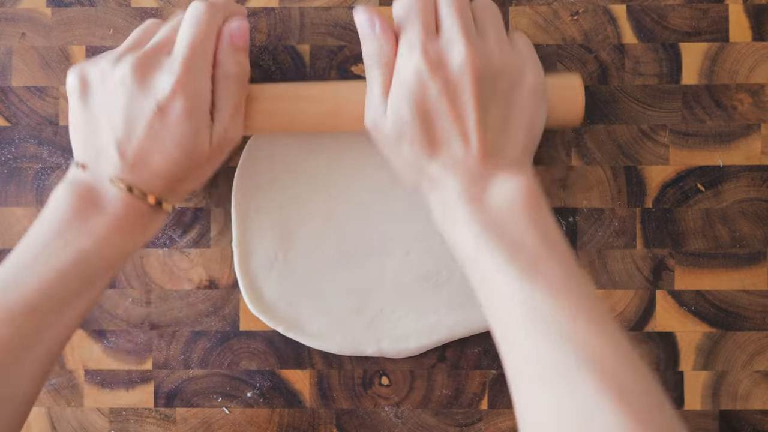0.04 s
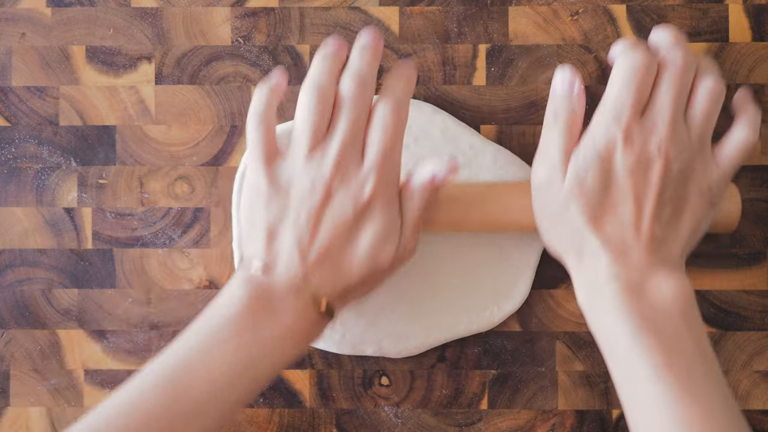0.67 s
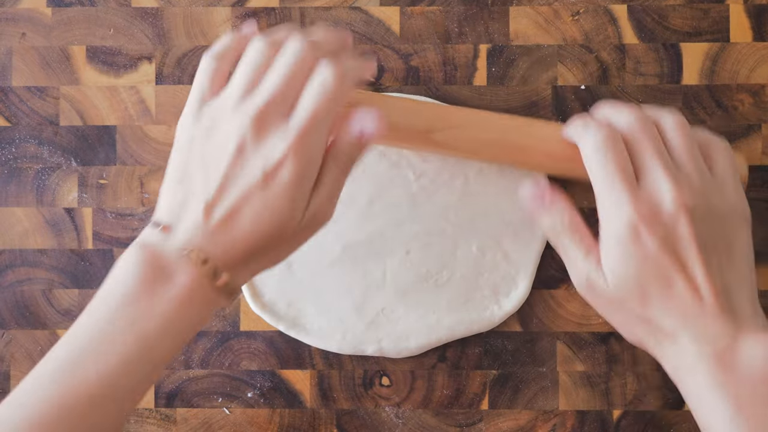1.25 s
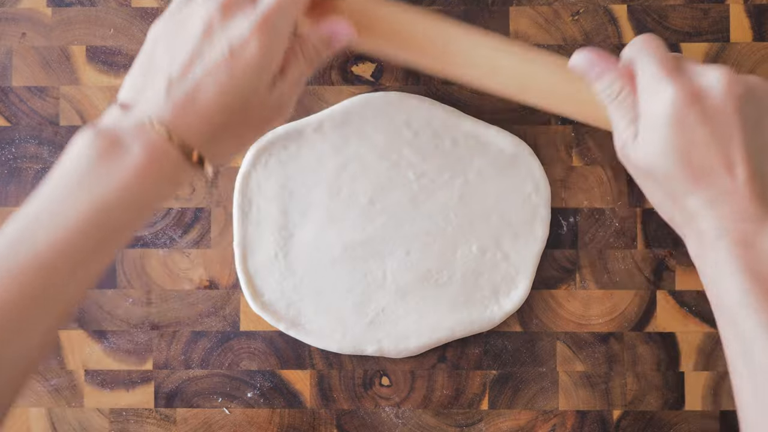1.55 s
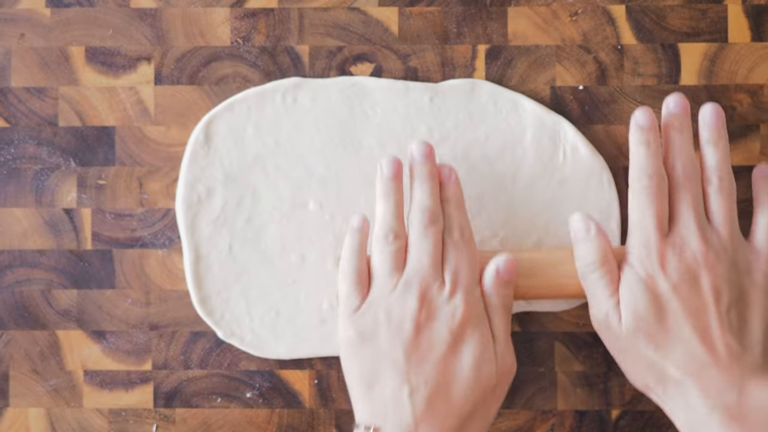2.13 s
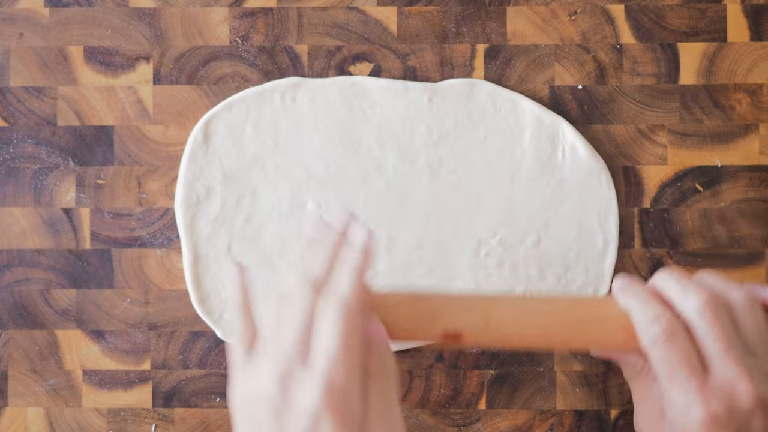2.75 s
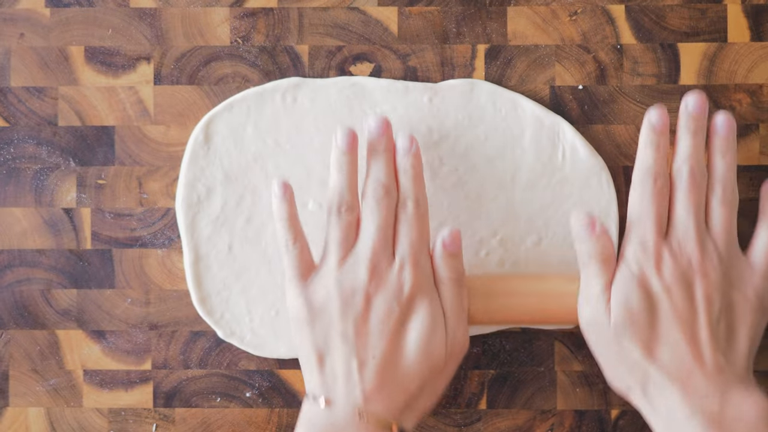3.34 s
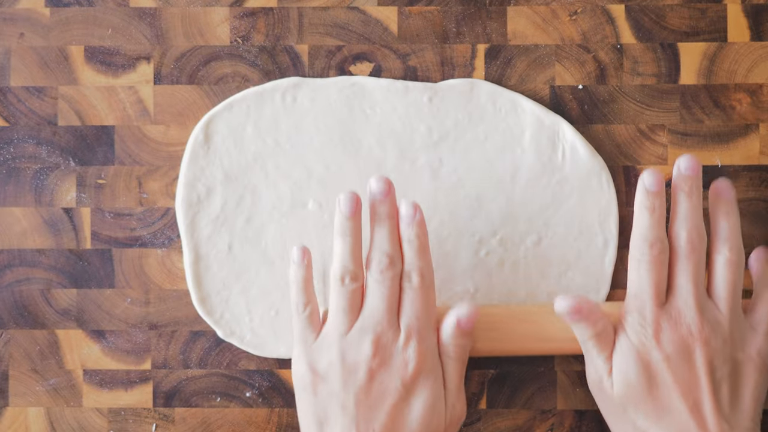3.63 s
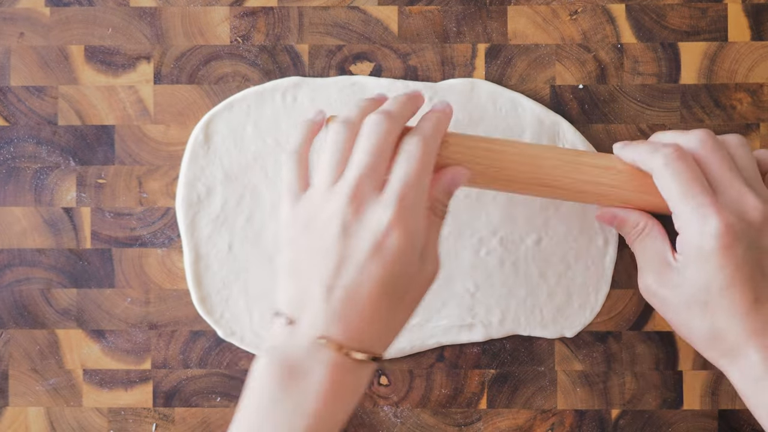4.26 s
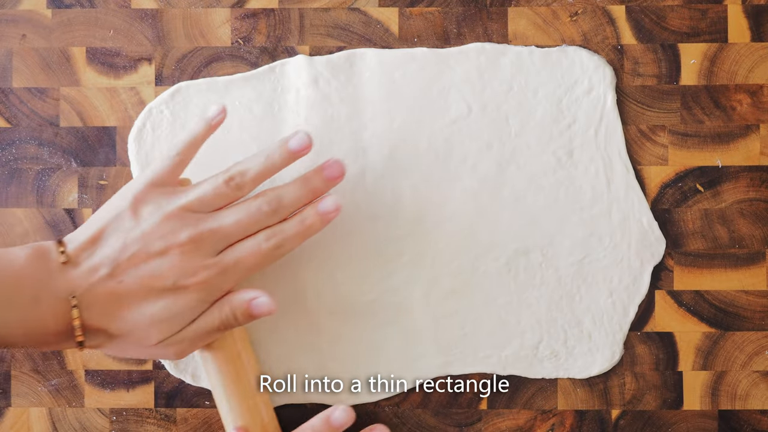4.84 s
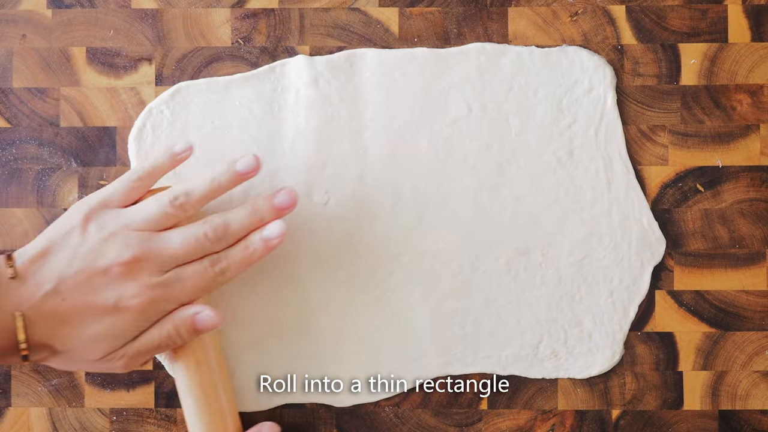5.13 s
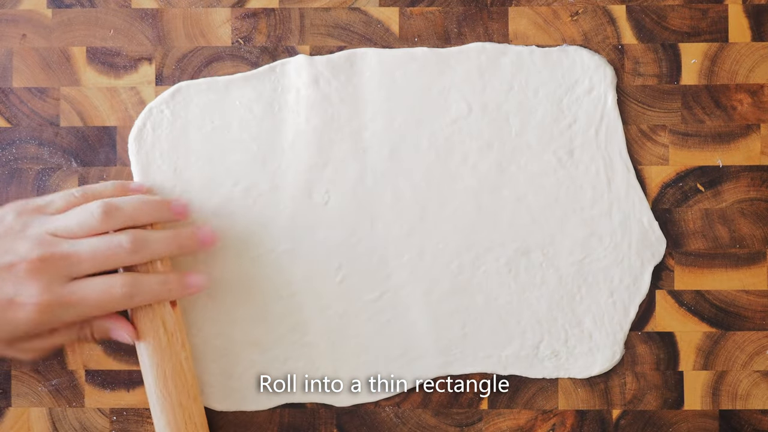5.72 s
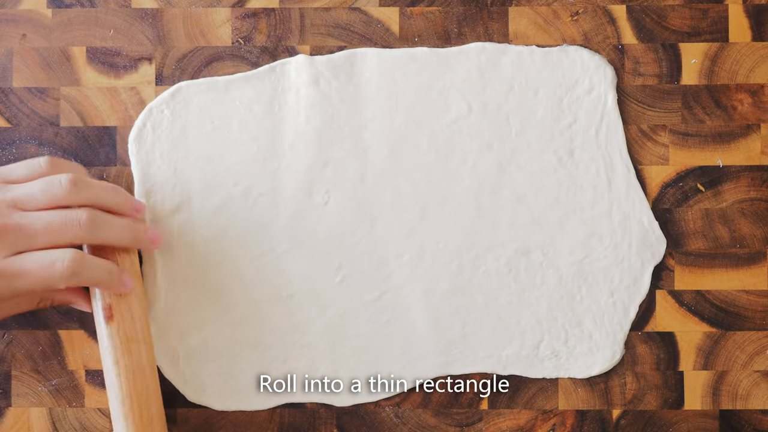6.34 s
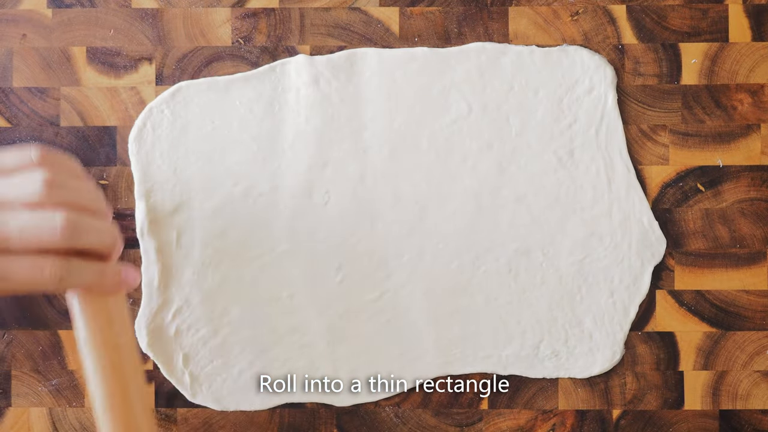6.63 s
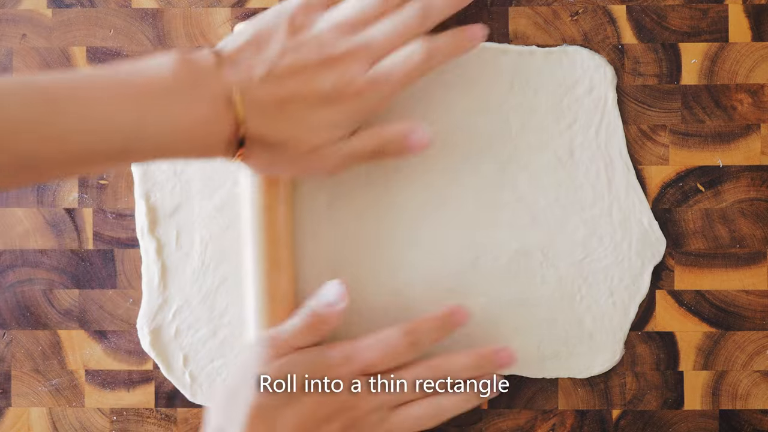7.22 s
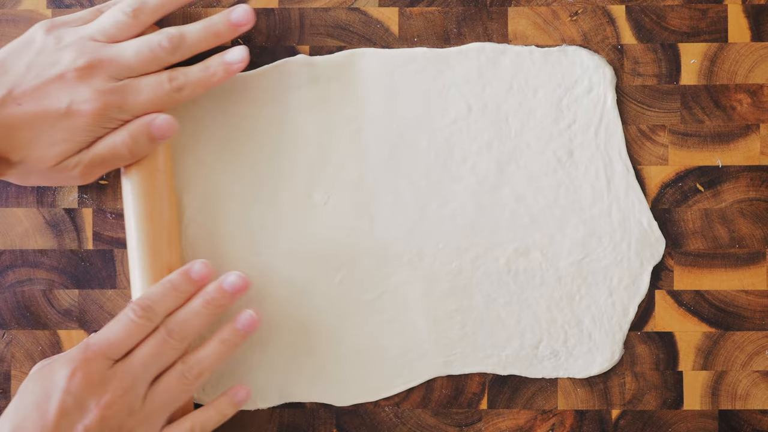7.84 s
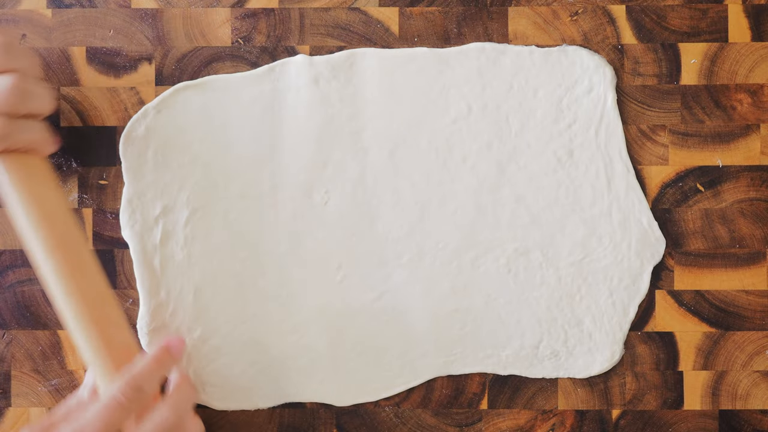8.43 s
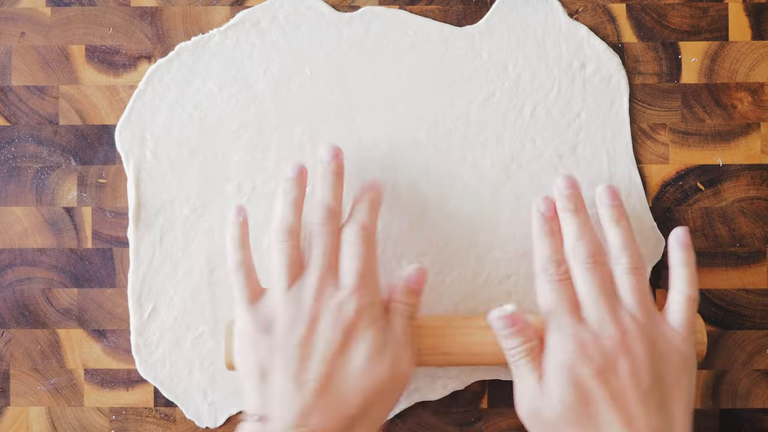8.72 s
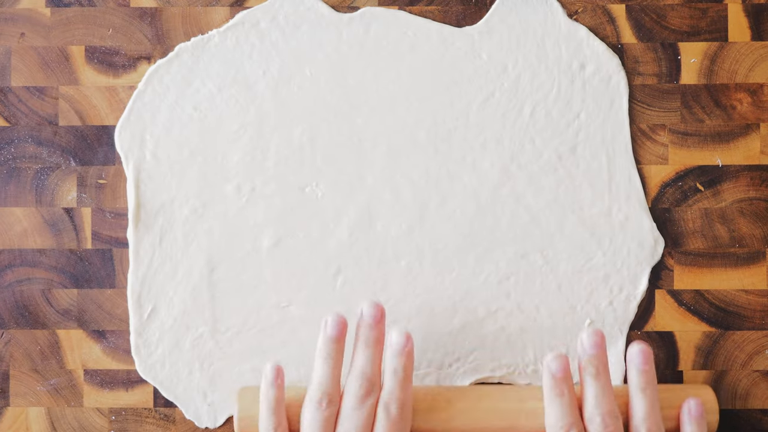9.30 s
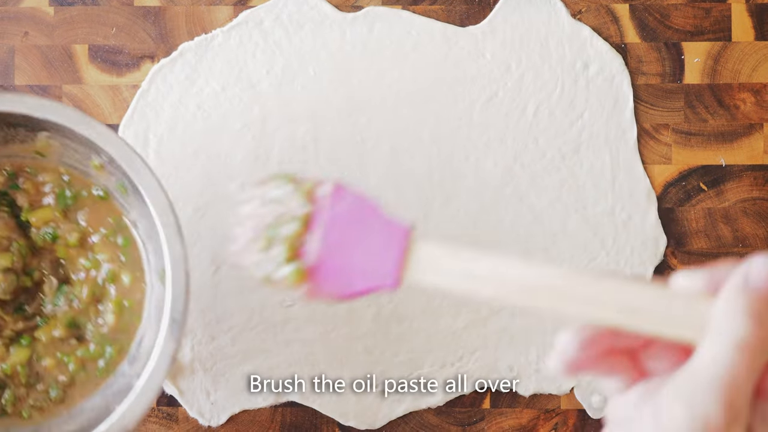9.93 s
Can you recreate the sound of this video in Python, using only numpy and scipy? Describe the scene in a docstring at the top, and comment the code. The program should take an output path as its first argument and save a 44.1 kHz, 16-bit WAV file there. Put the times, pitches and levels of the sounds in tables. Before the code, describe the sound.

A wooden rolling pin rolls dough on a wooden board, with soft rubbing, dull thuds and a few sharp knocks.

```python
"""Rolling pin on dough

A wooden pin flattens dough on a thick wooden board in a small kitchen. Impacts excite the damped
modes of the wood: dull thuds through the dough, bright knocks and rattles on the bare board.
Each stroke rocks the table at its lowest resonance. Palms rub the pin and brush the dough by
stick-slip friction. The sound is heard from close by, over room air and a little hiss."""
import sys
import numpy as np
from scipy import signal
from scipy.fft import rfft, irfft, next_fast_len
from scipy.io import wavfile

SR = 44100
rng = np.random.default_rng(int(sys.argv[2]) if len(sys.argv) > 2 else 0)


def unload_wav(signal):
    """Save mono or channel-first audio to the path in sys.argv[1] as 16-bit WAV at rate SR, clipped to [-1, 1]."""
    wavfile.write(
        sys.argv[1],
        SR,
        np.round(np.clip(np.atleast_2d(signal).T, -1, 1) * 32767).astype(np.int16),
    )


N = 439677
TIME = np.arange(N) / SR

# spectra of room air, table rumble, palm on pin, skin on dough: (frequency [Hz], relative density [dB])
AIR_SPECTRUM = [(20, -79.5), (35, -79.5), (48, -82), (65, -79), (110, -97), (200, -100), (350, -104),
                (408, -94), (470, -107), (650, -103), (1000, -112), (2500, -118), (8000, -129)]
RUMBLE_SPECTRUM = [(20, -11.5), (35, 11.5), (47, -11.5), (62, -5), (100, -24), (200, -33), (500, -50),
                   (5000, -84)]
PALM_SPECTRUM = [(500, -8.5), (1100, -10.5), (1650, 0.5), (2400, -5), (3500, 1), (4200, -3.5), (5300, -11),
                 (6300, -5.5), (7500, -15), (15000, -23)]
BRUSH_SPECTRUM = [(500, -6), (2000, -3.5), (5000, -2), (6600, -1.5), (8500, -3), (12000, -1.5),
                  (16000, -5.5)]
# air and hiss sink a little at the end: (time [s], gain [dB])
BACKGROUND_GAIN = [(9.79, 2), (9.81, -0.5)]
# reflections from worktop and walls: (delay [s], gain [dB])
ECHOES = [(.0026, -7), (.0063, -16.5), (.0118, -13.5), (0.0165, -15)]
# kitchen reverberation: (frequency [Hz], t60 [s])
KITCHEN_DECAY = [(100, 0.13), (500, .3), (1500, 0.24), (4000, 0.29), (10000, 0.16)]
# pushes on the pin: (time of greatest weight [s], rumble level [dB])
STROKES = [(.11, -52.5), (.56, -41.5), (1.38, -50), (1.82, -39), (3.32, -44.5), (4.06, -59), (4.5, -45.5),
           (6.06, -55), (6.5, -50), (7.02, -44.5), (7.331, -31.5), (8.44, -49), (8.87, -35.5)]
# skin brushing over dough: (centre time [s], length [s], level [dB])
BRUSHES = [(.28, 0.11, -73.5), (1.32, 0.32, -78.5), (2.47, 0.1, -68.5), (3.72, 0.082, -69),
           (3.85, 0.23, -75), (4.46, .14, -71), (5.48, .19, -76), (5.86, 0.26, -73.5), (8.39, 0.066, -72.5),
           (9.12, 0.078, -71.5)]
# firm slides of the palms: (centre time [s], length [s], level [dB], ring of the gripped pin [Hz])
PALM_SLIDES = [(0.274, 0.1, -71, 3770), (.68, .25, -79, 3700), (1.267, .035, -61, 3670),
               (1.344, 0.073, -64, 3820), (1.467, .18, -69.5, 3920), (2.034, 0.12, -80, 3780),
               (2.64, 0.098, -83, 3700), (3.011, 0.054, -77, 3650), (3.836, 0.24, -74.5, 3850),
               (4.388, 0.2, -78, 3800), (5.6, 0.62, -83.5, 4100), (5.893, 0.06, -66.5, 3610),
               (6.097, 0.14, -79, 3900), (6.365, 0.066, -74.5, 3680), (6.929, 0.12, -75, 3820),
               (8.228, 0.11, -72.5, 3660), (8.361, .13, -61, 3600), (8.51, 0.081, -73.5, 4020),
               (9.126, 0.061, -77, 3700), (9.675, .22, -76, 4010)]
# modes of pin and board together: (frequency [Hz], relative level [dB], t60 before added damping [s])
WOOD_MODES = [(78, -19, 0.12), (120.4, -8, 0.25), (222, -16, 0.067), (264, -9, 0.078), (351.3, -15, 0.042),
              (420.5, -16, 0.028), (560, -13, 0.19), (694, -4.5, 0.072), (870, -3.5, 0.044),
              (1030, -7.5, 0.045), (1234, -5, 0.038), (1318, 1, 0.044), (1451, -24.5, 0.017),
              (1706, -3, 0.029), (1814, -5.5, .05), (2120, -5.5, 0.045), (2440, -4.5, 0.047),
              (2810, -4, 0.013), (3020, -7, 0.013), (3210, -11, 0.021), (3710, -7, 0.059), (4030, -6, .03),
              (4780, -4.5, 0.011), (5660, -18.5, 0.032), (6520, -14.5, .02)]
# pin chatter: (centre time [s], length [s], level [dB], contact cut-off [Hz], favoured ring [Hz])
RATTLES = [(.952, 0.044, -63.5, 2260, 970), (1.259, 0.026, -54.5, 1460, 1030),
           (3.804, 0.056, -59.5, 3400, 566), (4.626, 0.1, -62.5, 3260, 1030), (4.95, 0.14, -67, 2730, 140),
           (5.888, 0.069, -58, 3100, 1990), (7.935, 0.051, -72, 1430, 740), (8.34, 0.1, -60.5, 2490, 1830),
           (8.361, 0.072, -50.5, 2330, 720), (9.628, .11, -62, 2047, 230),
           (9.767, .062, -64.5, 3480, 199.5)]
# dull blows of the pin's weight: (time [s], strength [dB], contact cut-off [Hz], favoured ring [Hz])
THUDS = [(0.432, -11.5, 310, 115), (1.345, -24.5, 444, 300), (1.49, -17.5, 450, 280),
         (1.701, -35, 420, 240), (3.024, -27.5, 257.4, 210), (3.81, -31, 300, 199), (4.336, -22, 254, 219),
         (5.252, -29, 300, 135), (5.884, -24, 298, 191), (6.413, -8.5, 185, 160), (6.905, -13.5, 372, 267),
         (6.98, -21, 168, 127.6), (7.201, -17.5, 249, 150), (8.25, -18.5, 235, 200),
         (8.549, -12.5, 210, 113.6)]
# pin striking the bare board: (time [s], strength [dB], contact cut-off [Hz], favoured ring [Hz])
KNOCKS = [(0.4349, -26, 3680, 730), (0.571, -23, 1500, 1050), (.905, -23, 1160, 1010),
          (1.311, -20.5, 4000, 1040), (1.344, -14.5, 1300, 1098), (1.4883, 2, 3900, 794),
          (5.883, -29, 2583, 1254), (6.118, -27.5, 826, 737), (6.4128, 6.5, 6300, 1794),
          (7.202, -10.5, 2900, 760), (8.249, -7, 2800, 1800), (8.546, -10, 640, 600),
          (8.742, -29.5, 870, 339), (9.469, -18.5, 2030, 1270), (9.752, -33, 2500, 1300)]

PIN_RING_HZ = 3720
HARDEST_CONTACT_HZ = max(row[2] for row in KNOCKS)


def from_db(db):
    """Amplitude ratio from decibels."""
    return 10 ** (np.asarray(db) / 20)


def unit_rms(x):
    """Normalisation to an rms of 1."""
    return x / np.sqrt(np.mean(x ** 2) + 1e-20)


def at_hz(points, hz):
    """Interpolation on a log-frequency axis."""
    known_hz, values = np.transpose(points)
    return np.interp(np.log(np.maximum(hz, 1)), np.log(known_hz), values)


def add(out, s, sound):
    """Superposition of a sound from time s."""
    start = max(round(s * SR), 0)
    out[start:start + len(sound)] += sound[:max(len(out) - start, 0)]


def butterworth(x, hz, order, kind="low"):
    """Maximally flat filter, low-pass by default."""
    return signal.sosfilt(signal.butter(order, hz, kind, fs=SR, output="sos"), x + 1e-18)


def resonate(x, hz, width_hz):
    """Two-pole resonance with a peak gain of 1."""
    r = np.exp(-np.pi * width_hz / SR)
    feedback = [1, -2 * r * np.cos(2 * np.pi * hz / SR), r * r]
    return signal.lfilter(np.array([1, 0, -1]) * (1 - r * r) / 2, feedback, x)


def coloured(x, spectrum):
    """Spectral shaping of a noise; rms 1."""
    size = next_fast_len(N)
    gain = from_db(at_hz(spectrum, np.fft.rfftfreq(size, 1 / SR)))
    return unit_rms(irfft(rfft(x, size) * gain, size)[:N])


def decay(t, t60):
    """Exponential decay by 60 dB in t60 seconds."""
    return np.exp(-np.log(1000) * t / t60)


def swell(s, length):
    """Bell-shaped envelope around time s: a mask of its samples, and their gains."""
    span = np.abs(TIME - s) < length
    return span, np.exp(-np.abs(2 * (TIME[span] - s) / length) ** 3)


def wander(per_s):
    """Random modulation with about per_s turns a second; rms 1."""
    turns = rng.standard_normal(int(TIME[-1] * per_s) + 2)
    return unit_rms(np.interp(TIME * per_s, np.arange(len(turns)), turns))


def background():
    """Noise floor: low room air common to both ears, and white hiss independent in each."""
    air = from_db(-63.5) * coloured(rng.standard_normal(N), AIR_SPECTRUM)
    hiss = from_db(-74) * rng.standard_normal((2, N))
    return (air + hiss) * from_db(np.interp(TIME, *np.transpose(BACKGROUND_GAIN)))


def reverberation(x, tail_db=-12, build_s=0.0036):
    """The kitchen's diffuse field builds up, then decays at its own rate in each band."""
    t = TIME[:SR // 2]
    edges_hz = np.geomspace(60, 15000, 10)
    tail = 0
    for low, high in zip(edges_hz, edges_hz[1:]):
        band = butterworth(rng.standard_normal(len(t)), [low, high], 2, "band")
        tail += band * decay(t, at_hz(KITCHEN_DECAY, np.sqrt(low * high)))
    tail *= (1 - np.exp(-t / build_s)) ** 2
    return from_db(tail_db) * signal.fftconvolve(x, tail / np.linalg.norm(tail))[:N]


def with_reflections(x):
    """Early reflections add delayed, weaker copies to the direct sound."""
    out = x.copy()
    for delay, db in ECHOES:
        add(out, delay, from_db(db) * x)
    return out


def weight(lean_db_per_s=150, ease_db_per_s=84.5, turn_s=0.058, resting_db=-63):
    """Rumble envelope: pushes rise fast, ease off, and add in power to the resting hands."""
    power = from_db(resting_db + 1.5 * wander(per_s=1.7)) ** 2
    for s, db in STROKES:
        away_s = np.hypot(TIME - s, turn_s) - turn_s  # rounds the peak
        slope = np.where(TIME < s, lean_db_per_s, ease_db_per_s)
        power += from_db(db - away_s * slope) ** 2
    return np.sqrt(power)


def table_rumble(sway_hz=35.18, rumble_db=-10):
    """Forced vibration: strokes drive the table's lowest resonance and a dull rumble around it."""
    narrow_band = resonate(rng.standard_normal(next_fast_len(N)), sway_hz, width_hz=5)
    phase = np.angle(signal.hilbert(narrow_band)[:N])
    sway = unit_rms(butterworth(np.cos(phase), 39, order=8))
    return weight() * (sway + from_db(rumble_db) * coloured(rng.standard_normal(N), RUMBLE_SPECTRUM))


def table_bump(s=9.797, db=-29, hz=28.8, contact_hz=420):
    """Free vibration: a last shove leaves the whole table swinging."""
    out, t = np.zeros(N), TIME[:SR // 2]
    add(out, s, from_db(db) * decay(t, t60=0.5) * np.cos(2 * np.pi * hz * t))
    return butterworth(out, contact_hz, order=3)


def slips(per_s, spread_db):
    """Stick-slip releases as a Poisson train of uneven impulses."""
    sizes = from_db(spread_db * np.minimum(rng.exponential(1, N), 4))
    return (rng.random(N) < per_s / SR) * sizes * rng.choice([-1, 1], N)


def hands(light_rub_db=-84.5, regrips_per_s=5.8, hands_off_s=9.8):
    """Skin friction whispers on the dough and excites the pin's resonance, which shifts with the grip."""
    friction = coloured(slips(per_s=2700, spread_db=4.5), PALM_SPECTRUM)
    brushing = coloured(slips(per_s=7900, spread_db=4), BRUSH_SPECTRUM)
    out = np.zeros(N)
    for s, length, db in BRUSHES:
        span, envelope = swell(s, length)
        out[span] += from_db(db) * envelope * brushing[span]
    for s, length, db, ring_hz in PALM_SLIDES:
        span, envelope = swell(s, length)
        rub = friction[span] + from_db(14) * resonate(friction[span], ring_hz, width_hz=190)
        out[span] += from_db(db) * envelope * unit_rms(rub)
    # between slides the palms never quite leave the pin
    light_rub = unit_rms(friction + from_db(11) * resonate(friction, PIN_RING_HZ, width_hz=260))
    grip = from_db(light_rub_db + 3 * wander(regrips_per_s)) * (TIME < hands_off_s)
    return out + grip * light_rub


def wood_ring(uneven_db, damping=1.5, dispersion=0.54):
    """Modal impulse response of pin and board; dispersion of bending waves spreads the attack."""
    t = TIME[:SR // 6]
    ring = 0
    for hz, db, t60 in WOOD_MODES:
        envelope = from_db(db + uneven_db * rng.normal()) * decay(t, t60 / damping)
        ring += envelope * np.cos(2 * np.pi * hz * t - dispersion * np.sqrt(hz))
    return ring - butterworth(ring, 200, order=1)  # the ring is thinned below about 200 Hz


def touch(ring, contact_hz, ring_hz, lift_db):
    """Contact filtering: softness weakens the high modes, position favours one ring; energy 1."""
    faint_edge = from_db(-25) * butterworth(ring, contact_hz, order=2)
    ring = butterworth(ring, contact_hz, order=6) + faint_edge
    ring += (from_db(lift_db) - 1) * resonate(ring, ring_hz, width_hz=60 + ring_hz / 22)
    return ring / np.linalg.norm(ring)


def rattles(stutter_db=3.5):
    """Impulse excitation: the turning pin catches on grain and flour in bursts, ringing the wood."""
    out = np.zeros(N)
    catches = unit_rms(slips(per_s=700, spread_db=1.5) * from_db(stutter_db * wander(per_s=110)))
    for s, length, db, contact_hz, ring_hz in RATTLES:
        span, envelope = swell(s, length)
        ring = touch(wood_ring(uneven_db=3.5), contact_hz, ring_hz, lift_db=13)
        add(out, s - length, from_db(db) * signal.fftconvolve(catches[span] * envelope, ring))
    return out


def contacts(hard_above_db=-3, other_end_s=0.0028):
    """Impacts: (time [s], strength [dB], cut-off [Hz], favoured ring [Hz], lift before focus [dB])."""
    rows = [(*thud, 4) for thud in THUDS]
    for s, db, contact_hz, ring_hz in KNOCKS:
        if db > hard_above_db:
            # a hard knock rings the pin itself, then its other end lands, softer and duller
            rows.append((s, db, contact_hz, PIN_RING_HZ, 12.5 * contact_hz / HARDEST_CONTACT_HZ))
            rows.append((s + other_end_s, db - 3, 0.45 * contact_hz, ring_hz, 13.5))
        else:
            rows.append((s, db, contact_hz, ring_hz, 7))
    return rows


def impacts(focus, damping, crack_db, crack_s=0.002, snap_s=0.0006):
    """Each thud or knock is a brief crack and a modal decay; focus scales the favoured ring's lift."""
    out = np.zeros(N)
    for s, db, contact_hz, ring_hz, lift_db in contacts():
        ring = wood_ring(uneven_db=2, damping=damping)
        t, noise = TIME[:len(ring)], rng.standard_normal(len(ring))
        crack = from_db(crack_db) * noise * np.exp(-t / crack_s)
        blow = touch(ring + crack, contact_hz, ring_hz, focus * lift_db)
        # the harder the contact, the stronger its bright snap
        snap = butterworth(noise * np.exp(-t / snap_s), 6500, order=3)
        blow += from_db(-24) * (contact_hz / HARDEST_CONTACT_HZ) ** 2 * snap / np.linalg.norm(snap)
        # a small, hard contact hardly moves the low modes
        blow = butterworth(blow, contact_hz / 15, 2, "high")
        add(out, s, from_db(db) * blow)
    return out


def scene():
    """Superposition of direct and diffuse sound, all centred; only the hiss differs between the ears."""
    rubbing = rattles() + hands()
    direct = impacts(focus=1.2, damping=1.6, crack_db=-5.5)
    # the walls are reached from all sides of the wood, so single rings blur together there
    all_round = impacts(focus=0.55, damping=3.6, crack_db=0)
    pin_and_hands = with_reflections(direct + rubbing) + reverberation(all_round + rubbing)
    return pin_and_hands + table_rumble() + table_bump() + background()


def record(dry, cutoff_hz=15750):
    """Band limiting: a steep elliptic low-pass removes the top of the treble."""
    return signal.sosfilt(signal.ellip(12, 0.1, 80, cutoff_hz, fs=SR, output="sos"), dry)


dry = scene()
out = record(dry)
unload_wav(out)
```